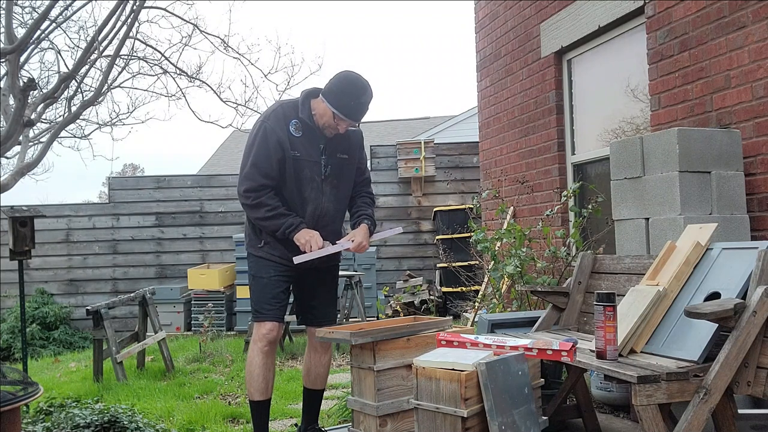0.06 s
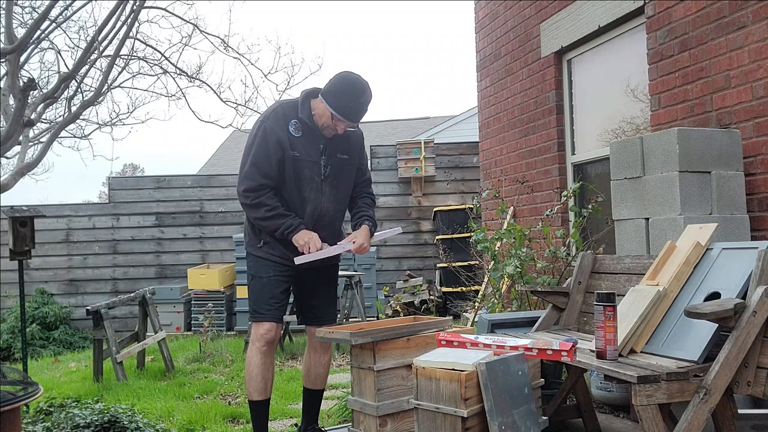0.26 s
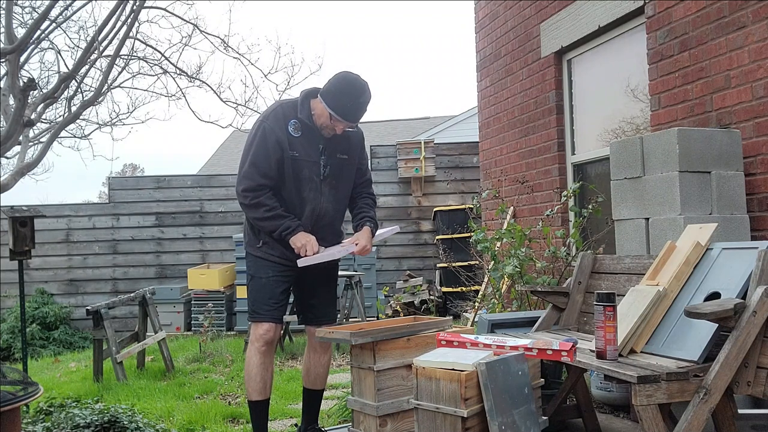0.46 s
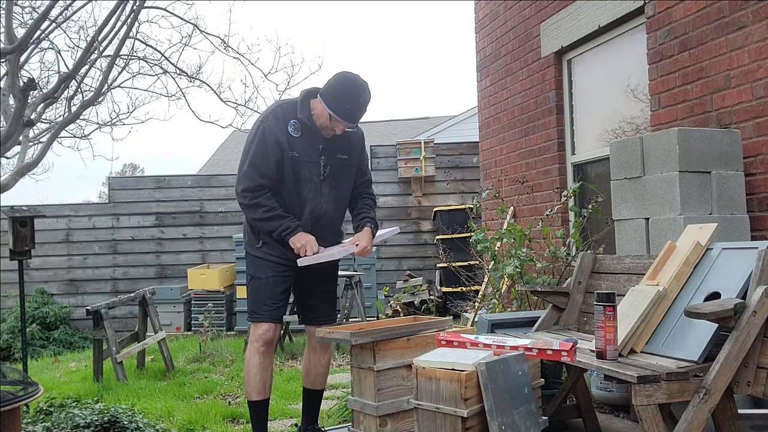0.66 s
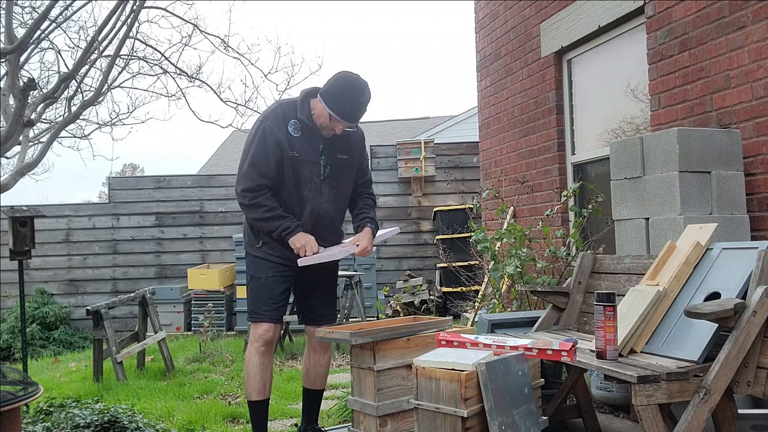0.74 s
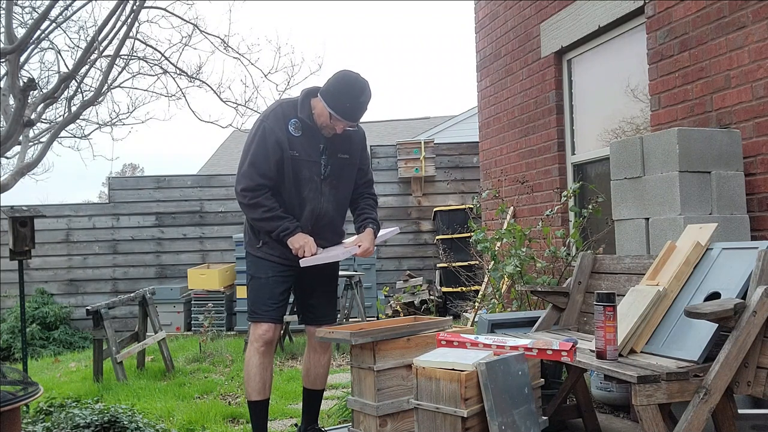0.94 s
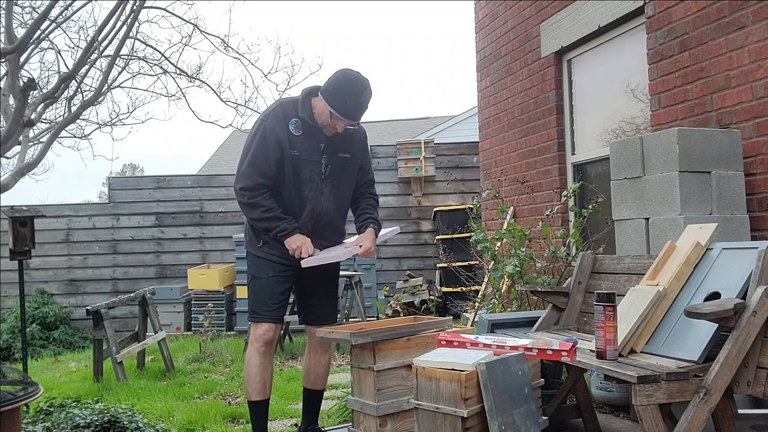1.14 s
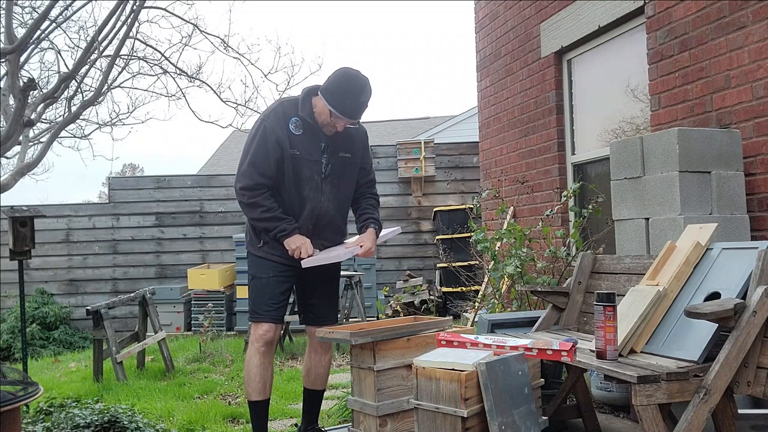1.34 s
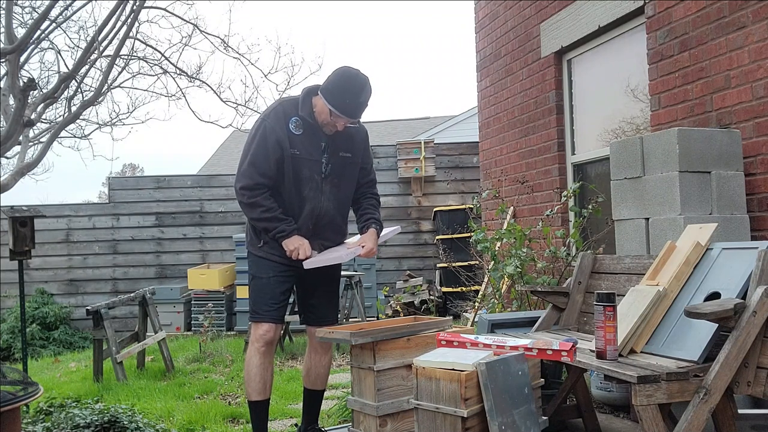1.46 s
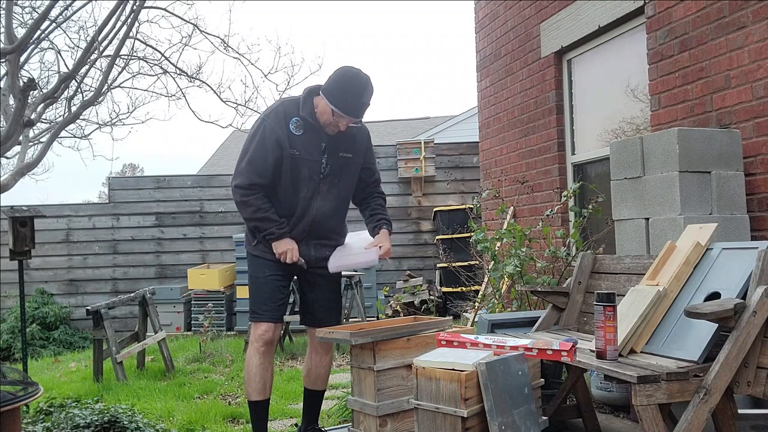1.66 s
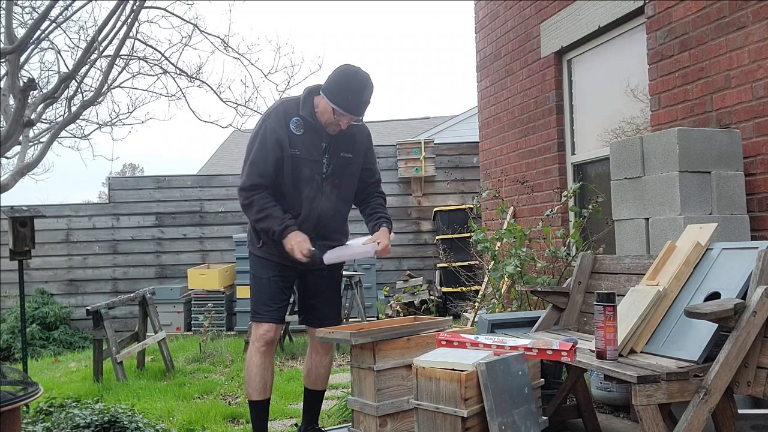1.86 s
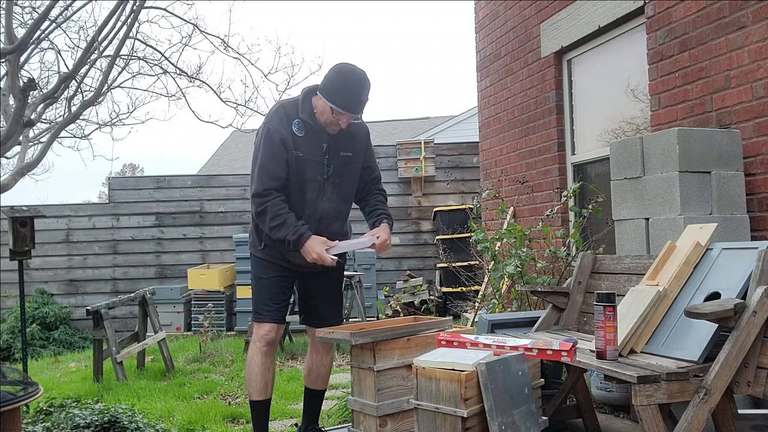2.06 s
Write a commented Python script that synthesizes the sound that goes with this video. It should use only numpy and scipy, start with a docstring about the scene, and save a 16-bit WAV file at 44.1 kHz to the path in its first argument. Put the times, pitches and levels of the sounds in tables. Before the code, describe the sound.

A foam board is cut by hand nearby in a quiet yard. Quick, hissing rasps come at about 0.3, 0.6, 1.0 and 1.2 seconds, with light scrapes and faint squeaks between them and a sharp knock of the blade at 0.7. A fifth stroke from 1.5 breaks through with a loud crunch and hollow thump near 1.7 seconds. Soft bumps follow, and faint outdoor air fades by 2 seconds.

```python
"""In a yard, a foam board is trimmed by hand: five quick rasping strokes of a blade, light slides between.
Stick-slip friction bursts foam cells, which sizzle; the board sounds hollow where the blade bites,
and faint squeaks glide as it moves on. The blade knocks once. The last stroke breaks through with a
thump, and the board is bumped as it is turned. Near surfaces return echoes over faint outdoor air."""
import sys
import numpy as np
from scipy import signal
from scipy.fft import rfft, irfft
from scipy.io import wavfile

SR = 44100
rng = np.random.default_rng(int(sys.argv[2]) if len(sys.argv) > 2 else 0)


def digitize_waveform(pressure):
    """Quantize a signal to 16-bit integers and store it at the path in sys.argv[1].

    Rows of a 2-D input are taken as channels; values are limited to [-1, 1].
    """
    field = np.atleast_2d(pressure).T
    bounded = np.clip(field, -1, 1)
    quanta = np.round(bounded * 32767).astype(np.int16)
    wavfile.write(sys.argv[1], SR, quanta)


N = 92610

# Spectra of the friction, from bright sizzle to hollow body: f/Hz, relative spectral level/dB
SIZZLE = [(7000, -20), (9700, -14), (11200, -16), (12100, -10), (12900, -6), (13600, -4.5), (14600, 0.5),
          (15400, -2), (16000, -9)]
RASP = [(3600, -29.5), (4400, -20.5), (4800, -11.5), (5500, -7), (6100, -9.5), (6900, -4.5), (7750, -7),
        (8500, 1), (9050, 2.5), (9700, -12), (11500, -17.5)]
CRUNCH = [(700, -19), (1500, -1.5), (1900, -3.5), (2300, -3.5), (2750, -2), (3200, -2.5), (3800, 1),
          (4100, -4.5), (4400, -1), (4800, -0.5), (5500, -0.5), (7500, -1.5), (10000, -11.5),
          (16000, -28.5)]
BODY = [(60, -19.5), (150, -16), (250, -7.5), (310, -14.5), (390, -14.5), (470, -7.5), (590, -1.5),
        (700, 0), (850, -5.5), (1030, -1), (1170, -6), (1320, -2), (1750, -20), (3000, -27)]


def strokes(t, grip):
    """Fracture noise: the moving edge bursts foam cells, heard as a bright sizzle over a lower rasp."""
    # One envelope per stroke: t/s, relative sizzle level/dB, relative rasp level/dB
    envelopes = [
        [(0.13, -61, -63), (0.16, -61, -49.5), (0.184, -34, -36), (0.212, -24.5, -30.5), (0.26, -24.5, -30),
         (0.3, -17.5, -24.5), (0.36, -32, -34.5), (0.386, -51, -39), (0.4, -56, -72)],
        [(0.45, -69, -60), (0.48, -28, -37.5), (0.512, -22, -24.5), (0.526, -18.5, -25.5), (0.574, -17.5, -21),
         (0.612, -13.5, -24.5), (0.626, -35.5, -33.5), (0.662, -67, -74), (0.68, -54, -85)],
        [(0.75, -55, -31.5), (0.766, -44, -51), (0.79, -35.5, -33.5), (0.878, -40, -36.5), (0.898, -24, -33.5),
         (0.962, -16.5, -23.5), (1.03, -22, -31), (1.042, -48, -39), (1.08, -68, -85)],
        [(1.11, -56.5, -68), (1.122, -54.5, -46), (1.138, -27.5, -36), (1.18, -19, -29.5), (1.228, -18, -27.5),
         (1.26, -21, -32), (1.292, -63, -68.5), (1.31, -48.5, -62)],
        [(1.43, -43, -43), (1.468, -33, -46), (1.486, -24.5, -44.5), (1.56, -21.5, -41), (1.64, -15.5, -25.5),
         (1.648, -16.5, -26), (1.682, -37, -36), (1.736, -49.5, -62), (1.78, -49, -59)],
    ]
    sizzle_gain_db, rasp_gain_db, edge_s = 0.5, 1.5, 0.0062
    sizzle = rasp = 0
    for envelope in envelopes:
        times, sizzle_db, rasp_db = np.transpose(envelope)
        outside_s = np.maximum(np.maximum(times[0] - t, t - times[-1]), 0)
        gate = np.exp(-outside_s / edge_s)
        sizzle += gate * from_db(np.interp(t, times, sizzle_db) + sizzle_gain_db)
        rasp += gate * from_db(np.interp(t, times, rasp_db) + rasp_gain_db)
    return sizzle * cells(SIZZLE, grip) + rasp * cells(RASP, grip)


def bites(t, grip):
    """Forced vibration: a deep bite makes the board resound, its colour changing as the cut grows."""
    # t/s, rise/s, fall/s, body level/dB, crunch level/dB, high-pass f/Hz,
    # hollow resonance f/Hz, gain/dB, crunch resonance f/Hz, gain/dB, notch f/Hz, depth/dB
    deep_cuts = [(0.296, 0.026, 0.035, -19, -25.5, 540, 993, 4.5, 3200, 2.5, 1820, 12),
                 (0.531, 0.023, 0.056, -22.5, -29, 380, 515, 6.5, 3270, 4, 2030, 3.5),
                 (0.583, 0.034, 0.033, -21, -22, 300, 465, 15, 3740, 3.5, 1900, 0.5),
                 (0.987, 0.035, 0.037, -27.5, -25.5, 190, 720, 9.5, 2270, 2, 3000, 7),
                 (1.222, 0.044, 0.039, -26, -25.5, 190, 1336, 3, 2510, 6, 3200, 7),
                 (1.616, .022, 0.019, -21.5, -19.5, 260, 588.6, 5.5, 2260, 4, 1953, 1),
                 (1.645, 0.019, 0.037, -23, -12.5, 220, 480, 4.5, 2690, 6, 2000, 0.5)]
    break_s, collapse_s, collapse_db = 1.655, 0.0062, -9  # the blade comes free
    out = 0
    for at, rise, fall, body_db, crunch_db, low_hz, *resonances in deep_cuts:
        hollow_hz, hollow_db, upper_hz, upper_db, notch_hz, notch_db = resonances
        depth = np.exp(-np.abs((t - at) / np.where(t < at, rise, fall)) ** 1.84)
        sound = from_db(body_db) * cells(BODY, grip) + from_db(crunch_db) * cells(CRUNCH, grip)
        sound = butterworth(sound, low_hz, "high", order=3)
        sound = bell(sound, hollow_hz, hollow_db, octaves=0.11)
        sound = bell(sound, upper_hz, upper_db, octaves=0.11)
        out += depth * bell(sound, notch_hz, -notch_db, octaves=0.32)
    return out * from_db(collapse_db * np.clip((t - break_s) / collapse_s, 0, 1))


def thumps():
    """Modal response: soft blows ring the board, and each contact's bandwidth sets which modes answer."""
    # Breakthrough and bumps: t/s, impulse level/dB, lowest f/Hz, highest f/Hz
    contacts = [(1.6592, -1.5, 104, 1510), (1.6674, 3.5, 110, 1010), (1.678, -44, 120, 735),
                (1.6855, -8.5, 120, 890), (1.7499, -14.5, 400, 600), (1.7545, -10.5, 557, 730),
                (1.8212, -17.5, 99.4, 496), (1.8257, -24, 99.8, 484.3)]
    # Modes of the board: f/Hz, gain/dB, T60/s
    board_modes = [(133, -28, 0.039), (180, -21.5, 0.034), (284.6, -5.5, 0.059), (400, -16.5, 0.053),
                   (447, -10, 0.035), (556, -22, 0.066), (692, -16.5, .1), (765, -23, 0.12),
                   (987, -25.5, 0.11), (1373, -23, .06)]
    force = 0
    for at, db, low_hz, high_hz in contacts:
        blow = butterworth(impulse(at, db), low_hz, "high", order=3)
        force += butterworth(blow, high_hz, "low", order=4)
    return ring(force, board_modes)


def knock(t):
    """Impact excitation: the blade jolts against the stiff board and crushes a little foam."""
    # Jolts within the one knock: t/s, impulse level/dB
    jolts = [(0.7392, 1), (0.74008, 0.5), (0.7444, -3.5), (0.7625, -24)]
    # Modes of the knock: f/Hz, gain/dB, T60/s
    knock_modes = [(530, -13, 0.043), (720, -16, .035), (1062, -12, 0.049), (1243, -10, 0.027),
                   (1790, -26.5, 0.031), (4460, -23.5, 0.004), (5000, -15, 0.0089)]
    crush_db, crush_decay_s = -31, 0.031
    age = t - jolts[0][0]
    envelope = from_db(crush_db) * (age > 0) * np.exp(-np.abs(age) / crush_decay_s)
    crushed = envelope * (cells(BODY) + from_db(-3.5) * cells(CRUNCH))
    force = sum(impulse(at, db) for at, db in jolts)
    return butterworth(ring(force, knock_modes) + crushed, 380, "high", order=4)


def ticks(t):
    """Damped transients: small touches of blade and fingers crush foam in very short crackles."""
    # Touches: t/s, relative level/dB
    touches = [(0.09, -42), (0.123, -24.5), (0.695, -31), (0.7094, -20), (0.72, -33.5), (0.7391, -10),
               (0.394, -22.5), (1.041, -30), (1.09, -27), (1.1369, -29), (1.306, -34), (1.327, -27),
               (1.6585, -7.5), (1.72, -30), (1.741, -33.5), (1.761, -43), (1.961, -47.5)]
    gain_db = -13
    envelope = sum(from_db(db + gain_db) * decay(t - at, t60=0.033) for at, db in touches)
    return envelope * (cells(SIZZLE) + from_db(-3.5) * cells(RASP) + from_db(-6) * cells(CRUNCH))


def slides(t, grip):
    """Sliding friction: the flat of the blade rubs in the cut and rings; overlapping rubs add in power."""
    # Light rubs: start t/s, attack/s, end t/s, release/s, level/dB of blade, body, crunch and sizzle
    rubs = [(-0.01, 0.0054, 0.0017, 0.013, -86, -31, -30, -29),
            (0.152, 0.11, 0.34, .035, -45, -51.5, -36, -64), (0.405, 0.016, 0.42, 0.02, -34, -46, -32, -33),
            (0.699, 0.045, 0.75, 0.0056, -48, -38, -54, -64),
            (0.745, .015, 1.03, 0.085, -38, -58.5, -60, -69),
            (0.95, 0.014, 1.08, 0.15, -43, -50.5, -71, -58.5),
            (1.19, 0.022, 1.45, 0.035, -45.5, -56.5, -61, -68),
            (1.328, .004, 1.352, 0.025, -44, -38.5, -55, -41),
            (1.373, 0.005, 1.398, 0.019, -36, -38.5, -45.5, -33.5),
            (1.41, 0.087, 1.59, 0.053, -49.5, -50, -54.5, -54),
            (1.81, .013, 1.83, 0.0096, -68, -60, -52.5, -34.5),
            (1.86, .02, 1.99, 0.062, -85.5, -79.5, -83, -75)]
    # Spectrum of the ringing blade: f/Hz, relative spectral level/dB
    blade = [(1000, -24), (1350, -12.5), (1700, -25.5), (2250, -17), (3050, -32.5), (3650, -11),
             (4300, -24), (4700, 5.5), (5050, -3), (5400, 4.5), (5850, -3.5), (6350, -2), (7100, 0.5),
             (7900, -21), (15000, -32)]
    powers = 0
    for start, attack, end, release, *levels_db in rubs:
        touch = np.clip((t - start) / attack, 0, 1) * np.exp(-np.maximum(t - end, 0) / release)
        powers += np.outer(from_db(levels_db), touch) ** 2
    spectra = (blade, BODY, CRUNCH, SIZZLE)
    rubbed = sum(np.sqrt(power) * cells(spectrum, grip) for power, spectrum in zip(powers, spectra))
    return butterworth(rubbed, 396, "high")


def squeaks(t):
    """Friction-driven resonance: foam on steel sounds narrow bands of noise that glide and flutter."""
    # Glides: start t/s, end t/s, start f/Hz, end f/Hz, width/Hz, level/dB
    glides = [(0.0, 0.131, 3600, 3770, 75, -54.5), (0.01, 0.126, 2220, 2230, 65, -57.5),
              (0.107, 0.199, 1660, 1550, 70, -55.5), (0.191, 0.283, 1400, 1108, 170, -39.5),
              (0.139, 0.297, 3420, 3207, 299.4, -44.5), (0.32, 0.514, 3530, 3210, 70, -49),
              (0.382, 0.399, 3432, 3343, 60, -39), (0.404, 0.447, 1417, 1640, 170, -43),
              (0.768, 0.844, 1071, 1090, 80, -60.5), (1.019, 1.22, 2260, 2390, 90, -54.5),
              (1.374, 1.42, 3630, 3785, 70, -45.5), (1.365, 1.6, 1335, 1323, 55, -47.5),
              (1.47, 1.601, 880, 892, 50, -52.5)]
    flutter_depth, flutter_hz = 0.69, 300
    out = 0
    for start, end, from_hz, to_hz, width_hz, db in glides:
        progress = np.clip((t - start) / (end - start), 0, 1)
        phase = 2 * np.pi * np.cumsum(from_hz + (to_hz - from_hz) * progress) / SR
        tone = unit_rms(drift(width_hz) * np.cos(phase) + drift(width_hz) * np.sin(phase))
        out += from_db(db) * np.sqrt(np.abs(np.sin(np.pi * progress))) * tone
    return out * (1 + flutter_depth * drift(flutter_hz)) / np.sqrt(1 + flutter_depth ** 2)


def edge_reflection(x):
    """Comb filtering: vibration returns from the board's far edge and interferes, sounding hollow."""
    delay_s, gain = 0.00305, from_db(-10)
    delayed = np.interp(np.arange(N) - delay_s * SR, np.arange(N), x, left=0)
    return (x + gain * butterworth(delayed, 9000, "low", order=1)) / np.sqrt(1 + gain ** 2)


def yard(x, t):
    """Reflection: near surfaces add a few discrete echoes and a faint, dull reverberant tail."""
    # Echoes from bench, ground, wall and fence: delay t/s, level/dB
    echoes = [(.0036, -25.5), (.0106, -15), (.0178, -19.5), (0.023, -22.5)]
    tail = butterworth(rng.standard_normal(N), 2500, "low", order=1) * decay(t, t60=0.19) * (t > 0.012)
    response = from_db(-33) * tail / np.linalg.norm(tail) + sum(impulse(at, db) for at, db in echoes)
    return x + signal.fftconvolve(x, response)[:N]


def outdoor_air(t):
    """Ambient noise: a faint broadband background that dies away at the end."""
    # Spectrum of the air: f/Hz, relative spectral level/dB
    air_spectrum = [(25, -22), (65, -3), (130, -8.5), (400, -6.5), (800, -5), (2000, -20.5), (5000, -17.5),
                    (16000, -34)]
    level_db, fade_start_s, fade_db_per_s = -61, 1.757, 61
    envelope = from_db(level_db - fade_db_per_s * np.maximum(t - fade_start_s, 0))
    return envelope * colour(rng.standard_normal(N), air_spectrum)


def cells(spectrum, grip=1):
    """Shot noise: foam cells burst at random, harder whenever the blade catches; rms 1."""
    bursts_per_s, spread_db = 16000, 1.5
    sizes = from_db(spread_db * np.minimum(rng.exponential(1, N), 4)) * rng.choice([-1, 1], N)
    bursting = rng.random(N) < bursts_per_s / SR
    return colour(grip * sizes * bursting, spectrum)


def ring(force, modes):
    """Modal superposition: each mode answers an impulse with a damped sine."""
    out = 0
    for hz, db, t60 in modes:
        r, w = decay(1 / SR, t60), 2 * np.pi * hz / SR
        out += from_db(db) * signal.lfilter([0, np.sin(w)], [1, -2 * r * np.cos(w), r * r], force + 1e-18)
    return out


def colour(x, spectrum):
    """Spectral shaping, falling 12 dB per octave below the first point; rms 1."""
    hz, db = np.transpose(spectrum)
    f = np.maximum(np.fft.rfftfreq(N, 1 / SR), 1)
    rolloff_db = 40 * np.log10(np.minimum(f / hz[0], 1))
    gain = from_db(np.interp(np.log(f), np.log(hz), db) + rolloff_db)
    return unit_rms(irfft(rfft(x) * gain, N))


def bell(x, hz, db, octaves):
    """A resonance peak or notch, Gaussian in log frequency."""
    distance = np.log2(np.maximum(np.fft.rfftfreq(N, 1 / SR), 1) / hz) / octaves
    return irfft(rfft(x) * from_db(db * np.exp(-distance ** 2)), N)


def drift(hz):
    """Low-passed Gaussian noise: a smooth random fluctuation of rms 1."""
    r = np.exp(-2 * np.pi * hz / SR)
    return unit_rms(signal.lfilter([1], [1, -2 * r, r * r], rng.standard_normal(N + SR))[SR:])


def butterworth(x, hz, kind, order=2):
    """Maximally flat high-pass or low-pass filter."""
    return signal.sosfilt(signal.butter(order, hz, kind, fs=SR, output="sos"), x + 1e-18)


def decay(age, t60):
    """Exponential damping from age 0, by 60 dB in t60 seconds."""
    return (age >= 0) * np.exp(-np.log(1000) * np.maximum(age, 0) / t60)


def impulse(at, db):
    """A one-sample pulse at a time in seconds."""
    return from_db(db) * (np.arange(N) == int(at * SR))


def from_db(db):
    """Decibels to amplitude ratio."""
    return 10 ** (np.asarray(db) / 20)


def unit_rms(x):
    """Normalisation to rms 1."""
    return x / np.sqrt(np.mean(x ** 2) + 1e-20)


def scene():
    """Superposition: the work, straight ahead, over air; strokes, bites and slides share one grip."""
    t = np.arange(N) / SR
    grip = from_db(1.5 * drift(hz=460) + 0.85 * drift(hz=22))  # stick-slip: quick catches, slow unevenness
    cutting = strokes(t, grip) + edge_reflection(bites(t, grip) + slides(t, grip)) + squeaks(t)
    work = cutting + ticks(t) + knock(t) + thumps()
    return np.tile(yard(work, t) + outdoor_air(t), (2, 1))


def record(dry):
    """Clipping and band limiting: peaks stop at full scale, then the highest treble is cut."""
    cutoff_hz = 15850
    taps = signal.firwin(301, cutoff_hz, fs=SR, window=("kaiser", 8))
    return signal.fftconvolve(np.clip(dry, -1, 1), taps[None], "same", axes=1)


dry = scene()
out = record(dry)
digitize_waveform(out)
```